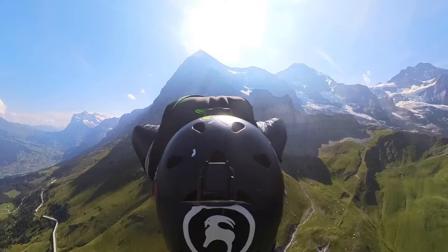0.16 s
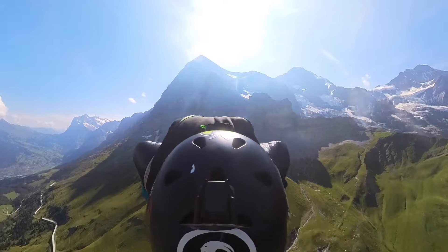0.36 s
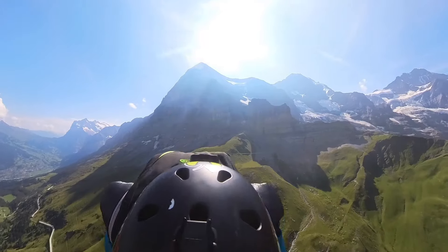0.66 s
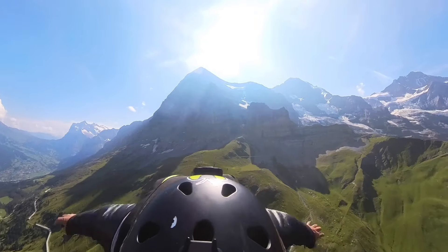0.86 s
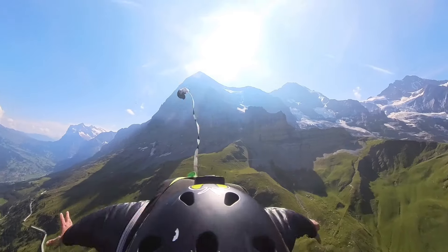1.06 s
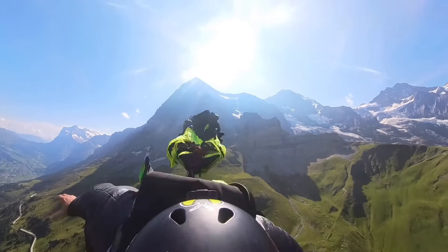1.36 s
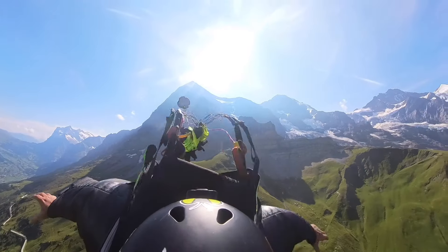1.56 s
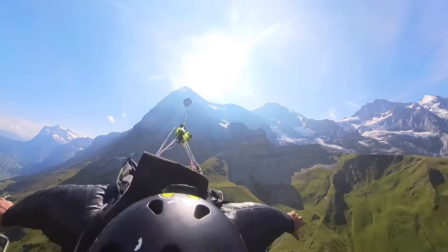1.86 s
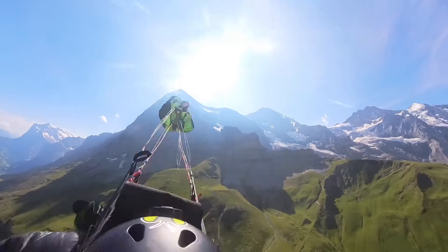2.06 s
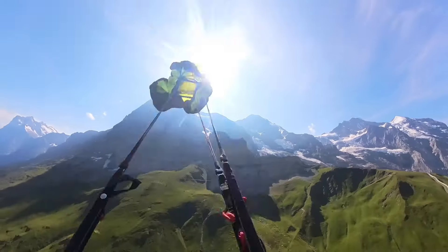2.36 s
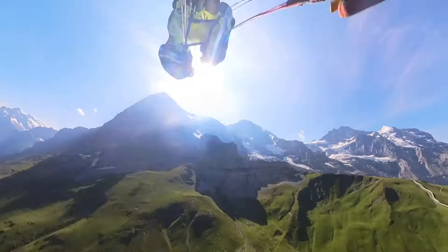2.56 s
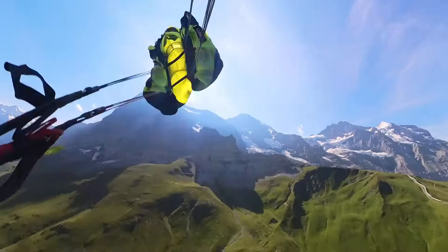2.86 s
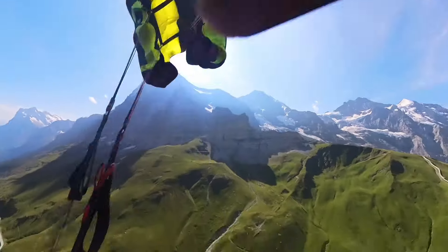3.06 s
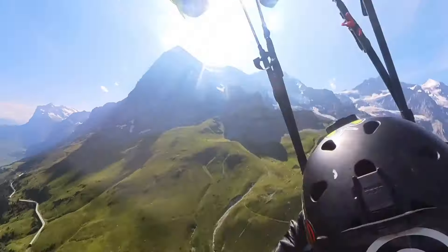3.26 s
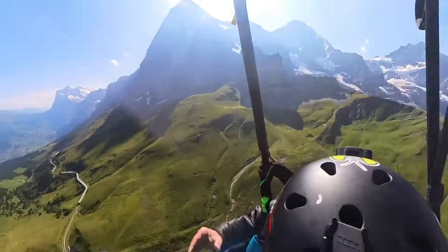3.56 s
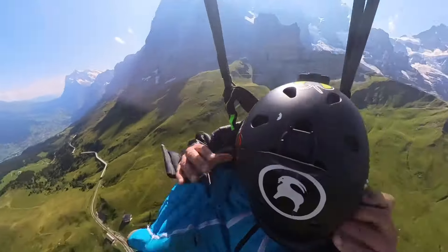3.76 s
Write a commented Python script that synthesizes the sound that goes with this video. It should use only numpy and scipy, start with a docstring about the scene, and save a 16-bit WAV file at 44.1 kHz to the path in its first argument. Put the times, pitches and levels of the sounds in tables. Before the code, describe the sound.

Fast wind roars against a helmet camera's microphone high in open air, with fabric flutter early; a parachute opens with sharp strap snaps and a buckle clink, then quiet breeze and dull gusty knocks follow.

```python
"""Wind roars over the microphone ports of a helmet camera in fast flight: noise in flickering bands, with a hiss,
a sliding whistle and suit fabric flutter made of noise and scattered clicks. A parachute opens with snaps of
straps and lines (filtered clicks), a struck buckle (decaying sines) and rustling cloth, and the airstream dies.
Separate dull gusts then buffet the ports over a soft steady breeze, and a thin hiss rises at the end. Dull knocks
fall from the late flight onwards, dry ticks during the opening and the gusts."""
import sys
import numpy as np
from scipy import signal
from scipy.fft import rfft, irfft
from scipy.io import wavfile
from scipy.ndimage import uniform_filter1d, minimum_filter1d

SR = 44100
rng = np.random.default_rng(int(sys.argv[2]) if len(sys.argv) > 2 else 0)


def store_pcm(level_fs):
    """Save levels as 16-bit WAV."""
    pcm = np.round(np.clip(level_fs, -1, 1) * 32767).astype(np.int16)
    wavfile.write(sys.argv[1], SR, np.atleast_2d(pcm).T)


def amplitude_ratio(level_db):
    """Convert a level in decibels to the matching linear amplitude (field) ratio."""
    exponent = np.asarray(level_db, float) / 20
    return 10 ** exponent


N = 173313
T = np.arange(N) / SR  # time axis [s]
FLIGHT_ENDS_S, FADE_S = 2.62, 0.0664  # the airstream fades out while the air under the canopy fades in

# airstream of the flight, before its fade: (time [s], rumble [dB], roar [dB], rush [dB], treble of the hiss [dB])
FLIGHT = [(0.0, -35.5, -21, -24.5, -52.5), (0.33, -33, -19.5, -26, -52), (0.42, -38, -22.5, -27, -55),
          (0.71, -40.5, -19, -25, -50.5), (1.05, -29.5, -23, -26.5, -48), (1.15, -31, -20, -27, -48),
          (1.84, -28, -19.5, -28, -51.5), (2.02, -33.5, -23, -27, -48), (2.05, -22, -17.5, -26.5, -49),
          (2.2, -32, -19.5, -29.5, -52), (2.39, -25.5, -19, -28.5, -52.5), (2.46, -29.5, -18, -21.5, -54.5),
          (2.49, -19, -24.5, -27, -54.5), (2.56, -41, -10.5, -20, -48), (2.62, -27, -10.5, -33, -59.5)]
# cloth rustling in bursts as the canopy spreads: (time [s], treble of the hiss [dB])
RUSTLE = [(2.624, -85), (2.642, -60), (2.65, -85), (2.66, -60), (2.667, -75), (2.675, -53), (2.686, -80),
          (2.745, -59), (2.775, -85)]
# spectra of the low, middle and upper wind and of its hiss: (frequency [Hz], density [dB per Hz])
RUMBLE = [(15, -19), (25, -16.5), (48, 4.5), (100, 0), (130, -39.5), (220, -120)]
ROAR = [(59, -35), (100, -10), (129, 0.5), (194, 1), (300, -9), (390, -26), (660, -120)]
RUSH = [(180, -43), (300, -3), (550, -8.5), (655, -13.5), (881, -13.5), (1220, -19), (1500, -28.5),
        (1950, -45.5), (3300, -120)]
HISS = [(880, -4), (1500, -0.5), (1580, -4.5), (2010, 2), (2470, -5), (4390, -7), (5340, -10.5),
        (9230, -17.5), (13700, -29.5), (15500, -37)]
# fabric flutter, before a fixed lift: (time [s], level [dB])
FLUTTER = [(0.0, -44), (0.086, -34), (0.12, -47), (0.128, -36), (0.334, -35), (0.358, -28.5), (0.405, -33),
           (0.422, -52), (0.452, -53), (0.506, -39.5), (0.6, -40.5), (0.642, -45), (0.7, -47)]
# spectrum of the flutter: (frequency [Hz], level [dB])
FLUTTER_COLOUR = [(300, -31), (600, 8.5), (1000, 2.5), (2000, -6), (4300, -18.5), (5200, -27.5),
                  (9000, -42)]
# bands of the stereo side noise, all above 3 kHz:
# (low [Hz], high [Hz], level against the floor of the band [dB], share of time [0-1])
SIDE_BANDS = [(3020, 3800, -4.5, 0.9), (3800, 4800, -5, 0.99), (4800, 6000, -3, 1), (6000, 7500, -4, .9),
              (7500, 9000, -4.5, .7), (9000, 10500, -4, .5), (10500, 12800, -2.5, .7)]
# breathy whistle sliding down: (time [s], pitch [Hz], level of the noise before it rides the pitch [dB])
WHISTLE = [(.72, 8900, -80), (.78, 8400, -53), (.9, 7300, -57), (1.0, 6800, -55), (1.06, 6400, -80)]
# sharp eddies that knock the ports: (time [s], peak [dB])
KNOCKS = [(2.119, -9.5), (2.5528, -4), (2.565, -13), (2.573, -11), (2.6195, -19), (2.632, -15),
          (2.7495, -11.5), (2.817, -20), (2.889, -15.5), (2.913, -16), (3.007, -26), (3.088, -7.5),
          (3.123, -15.5), (3.158, -24), (3.179, -23), (3.246, -21), (3.2765, -12), (3.312, -22),
          (3.37, -21), (3.4225, -14), (3.6945, -13), (3.7335, -14), (3.868, -23.5)]
# snaps of straps and lines: (time [s], peak [dB], low [Hz], high [Hz], decay constant of the tail [s])
SNAPS = [(2.4873, -8.5, 200, 3500, .00025), (2.524, -26, 1500, 6000, .0008),
         (2.5284, -24, 1500, 6000, 0.0007), (2.54, -26, 1500, 6000, 0.001),
         (2.5418, -14, 1000, 4700, 0.0018), (2.546, -38, 8000, 14000, .0015),
         (2.5552, -25, 11000, 14500, .0015), (2.5553, -19, 1500, 4500, 0.00086),
         (2.557, -37, 8000, 13100, 0.0018), (2.5755, -43, 9000, 14000, 0.0015),
         (2.621, -28, 300, 5500, 0.0003), (2.6330, -37, 1500, 6000, 0.0008), (2.661, -36, 800, 4500, 0.002),
         (2.6715, -35, 1500, 7800, 0.00082), (2.679, -46, 990, 6960, 0.001),
         (2.7400, -44, 1500, 9000, 0.0012), (2.7465, -43.5, 2000, 11000, .0015),
         (2.7515, -36.5, 500, 6000, 0.0006), (3.4227, -24, 300, 1570, 0.00068),
         (3.6772, -41.5, 500, 6500, 0.0007), (3.736, -26, 300, 2000, 0.00092)]
# strikes of the buckle: (time [s], peak [dB])
BUCKLE = [(2.5102, -6.5)]
# ringing modes of the buckle: (frequency [Hz], relative level [dB], time to fall 60 dB [s])
BUCKLE_MODES = [(1120, 10.5, 0.0081), (2270, 4.5, 0.0066), (3920, -9, 0.0076), (4900, -15, 0.007),
                (6200, -12, 0.0066)]
# dry ticks during the opening and the gusts, before a fixed lift: (time [s], peak [dB])
TICKS = [(2.5322, -25), (2.537, -22), (2.565, -26), (2.598, -34), (2.6013, -34), (2.61, -33), (2.6445, -36),
         (2.7035, -36), (2.725, -39), (2.7975, -41.5), (2.824, -43.5), (2.8285, -44), (2.834, -46),
         (2.897, -46), (2.9146, -35.5), (3.0068, -45), (3.0205, -43), (3.032, -40), (3.041, -43),
         (3.048, -44), (3.0705, -46), (3.0885, -44), (3.0945, -36.5), (3.1015, -40), (3.108, -46),
         (3.1175, -43), (3.125, -34), (3.131, -37), (3.16, -37), (3.181, -41.5), (3.198, -42),
         (3.2468, -43), (3.2572, -37), (3.2656, -40), (3.27, -39), (3.2755, -32.5), (3.2935, -42),
         (3.3, -45), (3.313, -39), (3.3175, -39.5), (3.416, -44.5), (3.607, -47.5), (3.6927, -37),
         (3.756, -45), (3.7667, -39), (3.771, -45.5), (3.7782, -40), (3.792, -41)]
# gusts under the canopy, before fade-in and layer trims: (time [s], rumble [dB], thud [dB], crackle [dB], treble [dB])
GUSTS = [(2.5, -27, -22, -36, -39), (2.546, -24, 14, -30, -33.5), (2.586, -32, -19, -23.5, -45),
         (2.63, -21.5, -18, -34, -47), (2.758, -24.5, -24.5, -31, -56), (2.786, -17, -14, -41, -76.5),
         (2.798, -17, -20, -32, -47), (2.814, -29, -21.5, -56, -79), (2.826, -27.5, -13.5, -31, -47),
         (2.882, -24, -21.5, -51, -77), (2.918, -23, -11, -33, -53), (2.926, -29, -34, -71, -75),
         (2.942, -17.5, -24.5, -32.5, -59), (2.97, -22, -21.5, -50, -74), (3.016, -34, -35, -36, -60),
         (3.048, -35.5, -20, -32.5, -42.5), (3.06, -23.5, -19, -48, -70), (3.092, -19, -11, -26, -41),
         (3.108, -26.5, -12, -40, -48.5), (3.132, -26, -19.5, -25.5, -42), (3.152, -29, -23, -50, -73),
         (3.16, -26, -23, -28, -47), (3.232, -31, -27, -46, -74.5), (3.256, -15.5, -27.5, -26.5, -50),
         (3.292, -30, -15, -35, -57), (3.352, -33, -33, -41, -75), (3.408, -19, -15.5, -33.5, -64),
         (3.424, -15, -25, -18, -50), (3.436, -37, -38, -61, -75), (3.458, -44, -34.5, -48, -69),
         (3.618, -41, -34.5, -44, -52), (3.65, -35.5, -39.5, -48, -79), (3.69, -23, -12, -29, -54),
         (3.71, -26, -16.5, -41, -59), (3.794, -18, -20.5, -33.5, -45), (3.806, -26.5, -35, -62, -76),
         (3.842, -43, -45.5, -70, -75), (3.882, -64, -22.5, -46, -60), (3.93, -41, -36, -48, -64)]
# spectra of the gust layers and the steady breeze: (frequency [Hz], density [dB per Hz])
THUD = [(59, -19.5), (100, -4.5), (156, 2.5), (199, -9), (300, -16.5), (390, -31.5), (660, -120)]
CRACKLE = [(250, -21), (320, -2.5), (500, -6), (900, -14), (1400, -24), (2200, -43), (3500, -64.5)]
TREBLE = [(900, -17), (1400, 2.5), (2500, -5), (4000, -17), (6000, -34), (9000, -50), (15000, -69)]
BREEZE = [(180, -13), (300, 5), (1120, -15.5), (1610, -25), (1920, -25.5), (2940, -35), (3900, -39),
          (6000, -53.5), (7800, -85.5), (13200, -120)]
# thin hiss rising at the end: (time [s], level [dB])
LATE_HISS = [(3.74, -100), (3.86, -77), (3.93, -67)]
# spectrum of the thin hiss: (frequency [Hz], density [dB per Hz])
LATE_COLOUR = [(3000, -18.5), (4000, 2), (9000, -6), (14500, 2.5), (15500, -26)]


def curve(table, col):
    """Draw one column of a time table as straight lines between its points."""
    rows = np.array(table)
    return np.interp(T, rows[:, 0], rows[:, col])


def colour(x, points):
    """Shape the spectrum of x by (frequency [Hz], level [dB]) points; rms 1."""
    hz, db = np.array(points, float).T
    f = np.maximum(np.arange(N // 2 + 1) * SR / N, 1)
    shape_db = np.interp(np.log(f), np.log(hz), db, left=-120, right=-120)
    y = irfft(rfft(x) * amplitude_ratio(shape_db), N)
    return y / np.sqrt(np.mean(y ** 2))


def walk(rate):
    """Random levels held for 1 / rate seconds and smoothed twice; spread 1."""
    hold = max(int(SR / rate), 1)
    steps = np.repeat(rng.standard_normal(N // hold + 1), hold)
    w = uniform_filter1d(uniform_filter1d(steps, hold), hold)[:N]
    return w / w.std()


def air(points, flicker_db, rate, shared=0, even_s=0.14, drift_db=0, count=3):
    """Turbulent noise: bands (count per octave) flicker and drift alone, share a gain in dB, then even out to rms 1."""
    spectrum = rfft(colour(rng.standard_normal(N), points))
    position = count * np.log2(np.maximum(np.arange(len(spectrum)) * SR / N, 1))
    first, last = int(count * np.log2(points[0][0])), int(count * np.log2(points[-1][0])) + 1
    out = 0
    for centre in range(first, last + 1):
        mask = np.cos(np.pi / 2 * np.clip(position - centre, -1, 1)) ** 2
        gain_db = flicker_db * walk(rate) + drift_db * walk(5)
        out = out + irfft(spectrum * mask, N) * amplitude_ratio(gain_db)
    out = out * amplitude_ratio(shared)
    return out / np.sqrt(uniform_filter1d(out ** 2, int(even_s * SR)) + 1e-12)


def grains(points):
    """Scattered clicks of very unequal size, 500 a second on average, in a colour; rms 1."""
    size_db = 5 * np.minimum(rng.exponential(size=N), 3)
    clicks = (rng.random(N) < 500 / SR) * amplitude_ratio(size_db)
    return colour(clicks * np.sign(rng.standard_normal(N)), points)


def click(lo_hz, hi_hz, length, order=3):
    """One impulse with a short noisy tail, cut to a band; peak 1."""
    t = np.arange(int(.03 * SR)) / SR
    y = rng.standard_normal(len(t)) * np.exp(-t / length)
    y[0] = np.sign(y[0]) * 7.0
    y = signal.lfilter(*signal.butter(2, lo_hz, "high", fs=SR), y)
    y = signal.lfilter(*signal.butter(order, min(hi_hz, 17000), fs=SR), y)
    return y / np.abs(y).max()


def place(events, sounds):
    """Lay each sound at its event's time and level."""
    out = np.zeros(N + SR)
    for (s, db, *_), y in zip(events, sounds):
        start = int(s * SR)
        out[start:start + len(y)] += amplitude_ratio(db) * y
    return out[:N]


def airstream(eddy):
    """Wind over the ports: rumble, roar and rush, the upper two swelling with the same eddies, then fading out."""
    rumble = amplitude_ratio(curve(FLIGHT, col=1)) * air(RUMBLE, 0.83, 11)
    roar = amplitude_ratio(curve(FLIGHT, col=2)) * air(ROAR, 0.56, 25.07, 0.79 * eddy)
    rush = amplitude_ratio(curve(FLIGHT, col=3)) * air(RUSH, 1.56, 60.33, 1.16 * eddy)
    return (rumble + roar + rush) * np.clip((FLIGHT_ENDS_S - T) / FADE_S, 0, 1)


def hiss(eddy):
    """Finely banded noise follows the flight's treble, then the bursts of rustling cloth."""
    treble_db = np.where(T < FLIGHT[-1][0], curve(FLIGHT, col=4), curve(RUSTLE, col=1))
    noise = air(HISS, 2.57, 34.94, 0.69 * eddy, drift_db=0.64, count=8)
    return amplitude_ratio(treble_db + 7) * noise * (T < RUSTLE[-1][0])  # the whole hiss lies 7 dB over its treble


def flutter():
    """Suit fabric flaps: noise shaken by fast random levels, mixed with grains."""
    flaps = air(FLUTTER_COLOUR, 1.1, 61, 2.5 * walk(300), even_s=0.038)  # 300 new levels a second
    cloth = amplitude_ratio(-3.5) * flaps + amplitude_ratio(-5) * grains(FLUTTER_COLOUR)
    return amplitude_ratio(curve(FLUTTER, col=1) + 8) * cloth * (T < FLUTTER[-1][0])


def side_noise(wind):
    """Stereo noise in bands above 3 kHz, sized by the floor of the wind in each band; it comes and goes."""
    spectrum, noise = rfft(wind), rfft(rng.standard_normal(N))
    f = np.arange(N // 2 + 1) * SR / N
    side = 0
    for lo, hi, db, share in SIDE_BANDS:
        band = np.clip(np.minimum(f - lo, hi - f) / 80 + .5, 0, 1)
        size = np.sqrt(uniform_filter1d(irfft(spectrum * band, N) ** 2, int(.012 * SR)) + 1e-18)
        floor = uniform_filter1d(minimum_filter1d(size, int(.015 * SR)), int(.01 * SR))  # skips short peaks
        gate = walk(30)
        is_open = gate < np.quantile(gate, np.clip(share, 0, 1))
        gate = uniform_filter1d(1. * is_open, int(.015 * SR))
        band_noise = irfft(noise * band, N)
        side = side + amplitude_ratio(db) * floor * gate * band_noise / band_noise.std()
    return side


def whistle():
    """A narrow band of noise riding on a sliding sine."""
    width_hz = 1100
    slow = colour(rng.standard_normal(N), [(1, 0), (width_hz / 2, -3), (width_hz, -30)])
    tone = np.sin(2 * np.pi * np.cumsum(curve(WHISTLE, col=1)) / SR)
    return amplitude_ratio(curve(WHISTLE, col=2)) * slow * tone * (T < WHISTLE[-1][0])


def knocks():
    """Sharp eddies push the ports: sudden dull swings, each a fast-dying sine of its own pitch."""
    centre_hz, t60_s, rise_s = 310, 0.026, 0.00051
    t = np.arange(int(.05 * SR)) / SR
    hz = centre_hz * (1 + 0.34 * rng.uniform(-0.78, 1, (len(KNOCKS), 1)))
    swing = -np.sin(2 * np.pi * hz * t) * np.exp(-np.log(1000) * t / t60_s)
    swing = swing * (1 - np.exp(-t / rise_s))
    return place(KNOCKS, swing / np.abs(swing).max(axis=1, keepdims=True))


def snaps():
    """Straps and lines snap: band-limited clicks, each with its own band and tail."""
    return place(SNAPS, [click(*row[2:]) for row in SNAPS])


def buckle():
    """A hard part is struck once and rings in short modes."""
    rise_s = 0.00099
    t = np.arange(int(.04 * SR)) / SR
    y = 0
    for hz, db, t60 in BUCKLE_MODES:
        y = y + amplitude_ratio(db) * np.sin(2 * np.pi * hz * t) * np.exp(-np.log(1000) * t / t60)
    y = y * (1 - np.exp(-(t / rise_s) ** 2))
    return place(BUCKLE, [y / np.abs(y).max()])


def ticks():
    """Dry clicks from 500 to 2500 Hz with a steep top, lifted by 3 dB."""
    return amplitude_ratio(3.0) * place(TICKS, [click(500, 2500, .0016, order=5) for _ in TICKS])


def gusts():
    """Slow eddies thud on the ports; their crackle and treble noise bursts together, mixed with grains."""
    burst = walk(180)
    rumble = air(RUMBLE, .6, 18.0, even_s=0.073)
    thud = air(THUD, 0.61, 23, 2.0 * walk(80), even_s=0.051)
    crackle = amplitude_ratio(-5) * air(CRACKLE, 0.67, 60, 4 * burst, 0.058) + amplitude_ratio(-1) * grains(CRACKLE)
    treble = amplitude_ratio(-12) * air(TREBLE, 1.5, 50, 5 * burst, 0.031) + amplitude_ratio(-10) * grains(TREBLE)
    layers = [rumble, thud, crackle, treble]
    return sum(amplitude_ratio(curve(GUSTS, col=i)) * layer for i, layer in enumerate(layers, 1))


def breeze():
    """Soft turbulent noise at a steady level."""
    return amplitude_ratio(-46) * air(BREEZE, 1.2, 18)


def late_hiss():
    """Thin flickering treble noise that rises at the end."""
    return amplitude_ratio(curve(LATE_HISS, col=1)) * air(LATE_COLOUR, 2.5, 60)


def scene():
    """Flight gives way to the air under the canopy; all sources are central, side noise is added left, taken right."""
    eddy = walk(110)
    flight = airstream(eddy) + hiss(eddy) + flutter() + whistle()
    fade_in = np.clip((T - FLIGHT_ENDS_S + FADE_S) / FADE_S, 0, 1)
    canopy = (gusts() + breeze() + late_hiss()) * fade_in
    wind = flight + canopy + ticks()
    mid = wind + knocks() + snaps() + buckle()
    side = side_noise(wind)
    return np.array([mid + side, mid - side])


def top_cut(x):
    """Nothing passes above the cut-off."""
    return signal.sosfilt(signal.butter(12, 16060, fs=SR, output="sos"), x)


def record(dry):
    """The camera rounds the loudest swings of the centre and cuts the top."""
    ceiling, top_hz = .8, 15300
    mid, side = dry.mean(axis=0), (dry[0] - dry[1]) / 2
    mid = mid / (1 + (np.abs(mid) / ceiling) ** 4) ** .25
    low_pass = signal.ellip(6, .5, 40, top_hz, fs=SR, output="sos")
    mix = signal.sosfilt(low_pass, [mid + side, mid - side])
    return top_cut(mix)


dry = scene()
out = record(dry)
store_pcm(out)
```